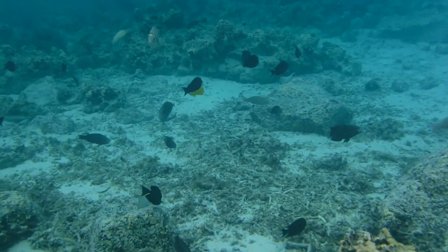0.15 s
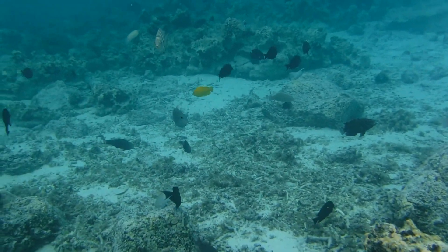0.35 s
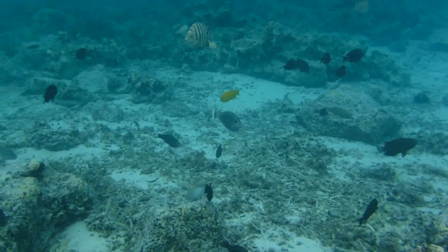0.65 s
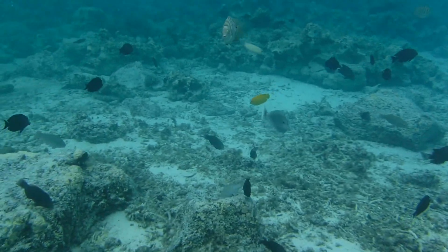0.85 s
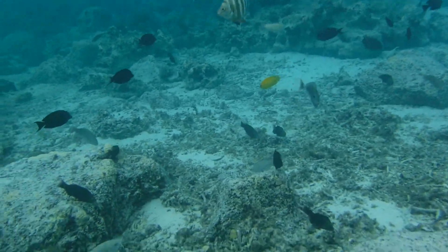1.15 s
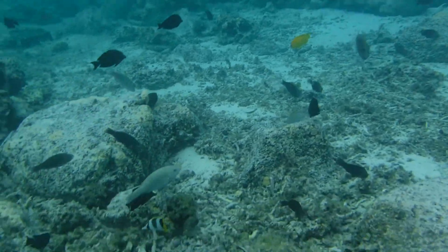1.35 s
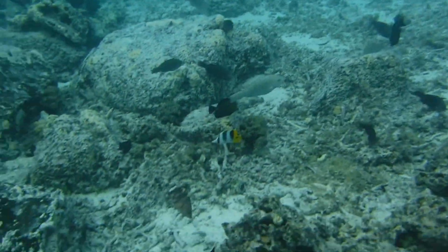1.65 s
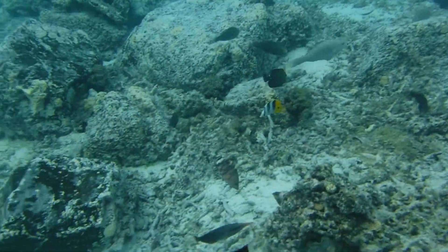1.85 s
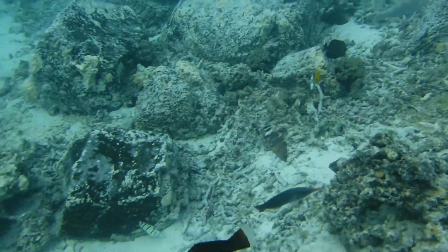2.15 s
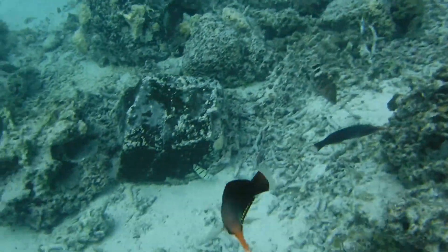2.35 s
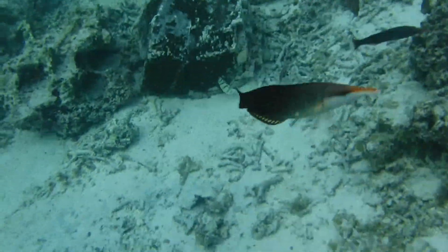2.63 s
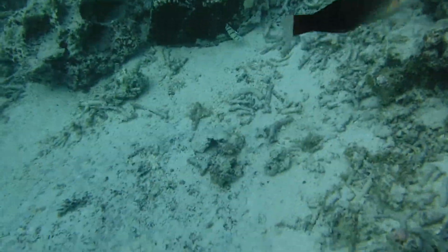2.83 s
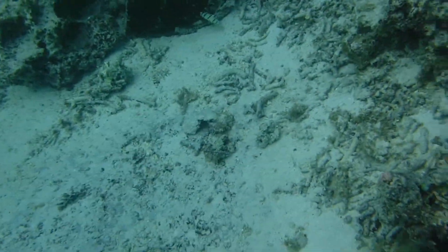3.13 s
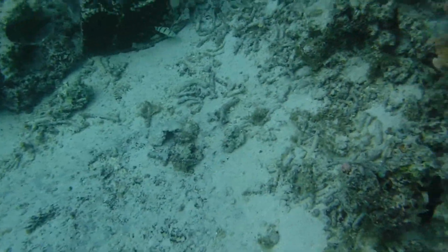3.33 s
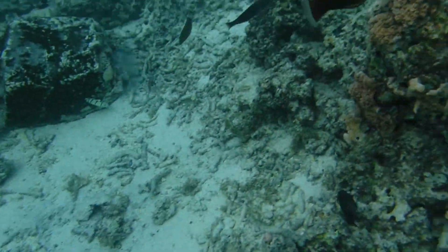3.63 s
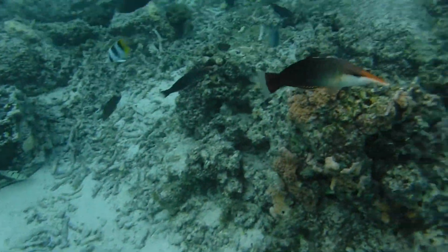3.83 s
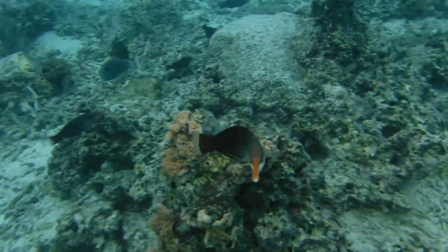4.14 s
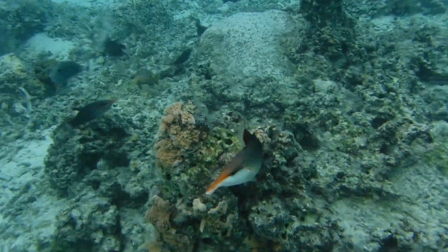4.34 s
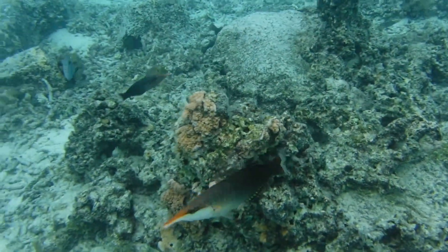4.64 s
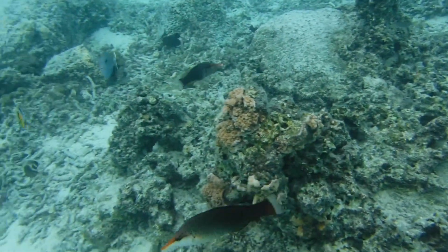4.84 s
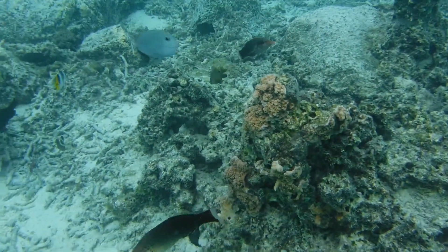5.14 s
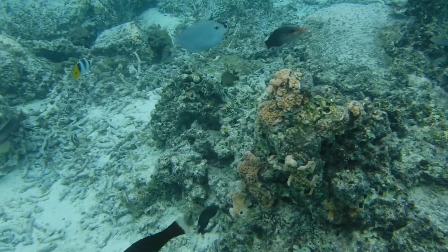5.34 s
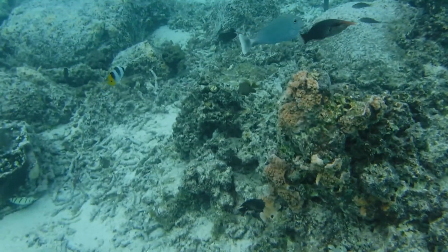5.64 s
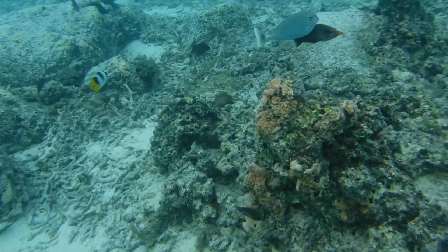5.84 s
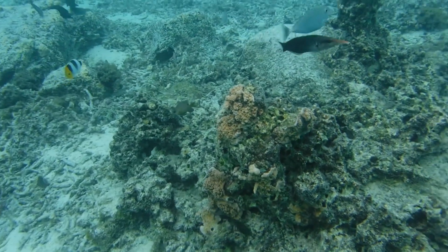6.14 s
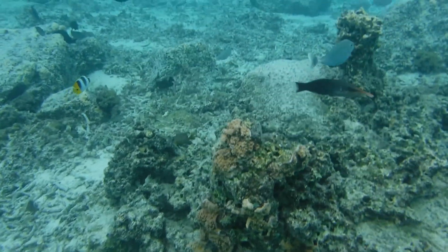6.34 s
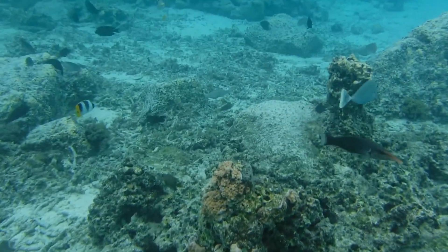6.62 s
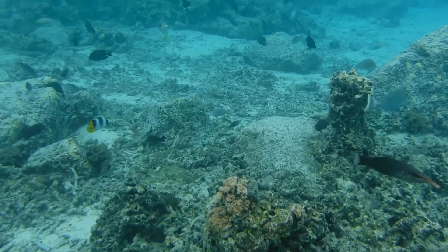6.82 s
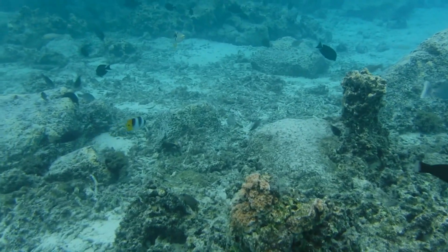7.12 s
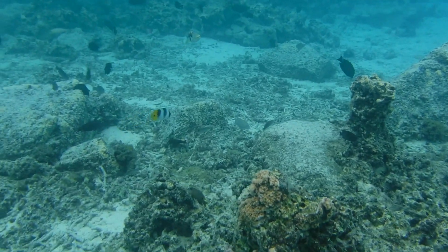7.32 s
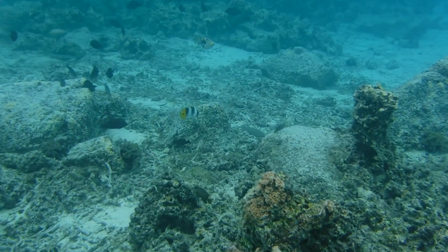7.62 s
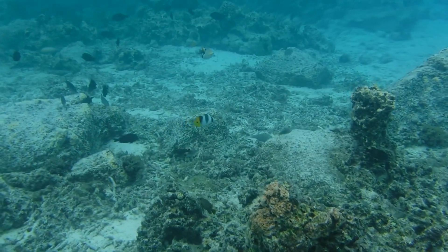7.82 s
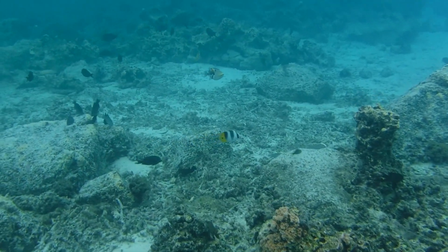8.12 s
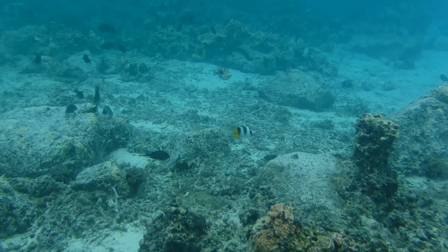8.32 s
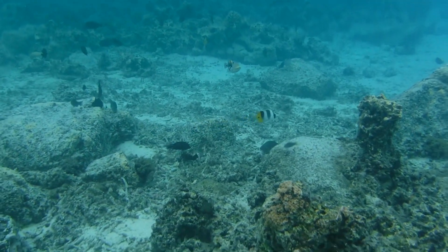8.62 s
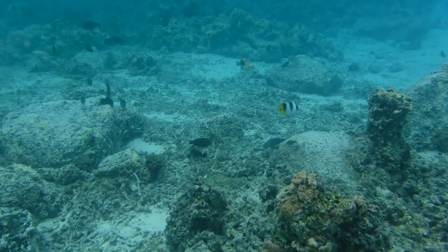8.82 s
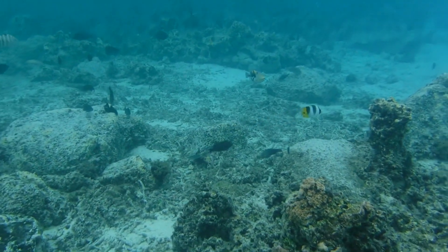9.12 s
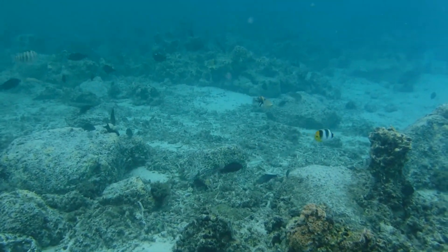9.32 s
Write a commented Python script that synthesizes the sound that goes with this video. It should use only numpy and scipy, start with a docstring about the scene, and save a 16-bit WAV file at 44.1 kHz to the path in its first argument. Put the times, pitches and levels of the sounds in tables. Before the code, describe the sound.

Muffled underwater hum and low water rumble, with dull knocks and a brief scrape on the camera housing and faint shrimp ticks.

```python
"""Water rumbles and a muffled hum fills a waterproof camera housing carried over a coral reef.
The flow buffets the case; steady shaking through its resonances makes the hum.
The grip knocks, rubs, judders and once scrapes on the shell.
Snapping shrimp tick faintly as their bubbles collapse; the electronics add hiss and a thin whine."""
import sys
import numpy as np
from scipy import signal
from scipy.fft import rfft, irfft
from scipy.io import wavfile

SR = 44100
rng = np.random.default_rng(int(sys.argv[2]) if len(sys.argv) > 2 else 0)


def pcm_store(signal):
    """Save signal as 16-bit PCM."""
    levels = np.round(np.clip(np.atleast_2d(signal), -1, 1) * 32767)
    wavfile.write(sys.argv[1], SR, levels.astype(np.int16).T)


N = 417625
TIME_S = np.arange(N) / SR
BINS_HZ = np.fft.rfftfreq(N, 1 / SR)


def amp(db):
    """Decibels to gain."""
    return 10 ** (np.asarray(db) / 20)


def unit(x):
    """Scale to rms 1."""
    return x / np.sqrt(np.mean(x ** 2) + 1e-20)


def follow(rows, column=1):
    """One column of a time curve, per sample."""
    rows = np.array(rows)
    return np.interp(TIME_S, rows[:, 0], rows[:, column])


def slope(points):
    """Gain per bin from (freq_hz, gain_db) points."""
    hz, db = np.transpose(points)
    return amp(np.interp(np.log(BINS_HZ + 1), np.log(hz), db))


def hump(hz, width_hz):
    """Gain per bin of one resonance."""
    return 1 / (1 + (2 * (BINS_HZ - hz) / width_hz) ** 2)


def colour(x, gain):
    """Filter x, then scale to rms 1."""
    return unit(irfft(rfft(x) * gain, N))


def noise(gain):
    """Noise of the given spectrum, rms 1."""
    return colour(rng.standard_normal(N), gain)


def drift(rate_hz):
    """Smooth random wander, rms 1."""
    return noise(np.exp(-(BINS_HZ / rate_hz) ** 2))


def add(mix, start_s, sound):
    """Mix a sound in at start_s."""
    part = mix[max(round(start_s * SR), 0):][:len(sound)]
    part += sound[:len(part)]


def ring(hz, t60_s, attack_s):
    """Struck mode: builds during contact, then decays."""
    t = TIME_S[:SR // 5]
    return np.sin(2 * np.pi * hz * t) * amp(-60 * t / t60_s) * (1 - np.exp(-t / attack_s))


def burst(hz, width_hz, t60_s):
    """Decaying noise puff through one resonance, peak 1."""
    t = TIME_S[:SR // 10]
    puff = rng.standard_normal(len(t)) * amp(-60 * t / t60_s)
    resonance = np.sin(2 * np.pi * hz * t) * np.exp(-np.pi * width_hz * t)
    out = signal.fftconvolve(puff, resonance)[:len(t)]
    return out / abs(out).max()


def stroke(start_s, length_s, attack_s, t60_s):
    """Gain of one movement: rise, hold, decay."""
    t = TIME_S - start_s
    return np.clip(t / attack_s + .5, 0, 1) * amp(-60 * np.maximum(t - length_s, 0) / t60_s)


def strokes(rows, attack_s, t60_s):
    """Gain of several movements; powers add."""
    return np.sqrt(sum((amp(db) * stroke(start_s, length_s, attack_s, t60_s)) ** 2
                       for start_s, length_s, db in rows))


def water(flow_db=5.5, lumps_db=1.9, shove_cycles=0.57):
    """Lumpy flow rumble; each shove swings the pressure for a cycle or two."""
    # flow strength: time_s, level_db
    flow = [(0, -34), (.6, -32.5), (1.5, -31.5), (2.9, -29.5), (3.45, -23.5), (3.7, -31.5), (3.9, -25.5),
            (4.5, -26.5), (5.3, -30), (6.2, -25), (6.6, -32.5), (7.3, -24.5), (7.9, -35), (8.6, -33.5),
            (9.0, -29), (9.47, -35.5)]
    # flow spectrum: freq_hz, gain_db
    spectrum = [(5, -23), (16, 1), (26, 5), (45, -6.5), (70, -8), (110, -18), (170, -22), (400, -54.5),
                (1000, -91.5)]
    # slow shoves on the case: centre_s, level_db, pitch_hz
    shoves = [(.483, -10.5, 24.7), (0.607, -8, 50), (1.59, -11, 54), (2.284, -8, 30.6), (2.352, -8, 32),
              (2.428, -3, 42.2), (4.332, -7.5, 28.6), (4.695, -3.5, 42), (6.135, -3.5, 50.7),
              (6.287, -3, 53.5), (6.324, -7, 74), (7.147, -8, 56), (7.312, 0, 58.3), (8.406, -10, 30.2),
              (8.827, -7.5, 52), (9.002, -9.5, 41.8), (9.238, -9.5, 54.7)]
    out = noise(slope(spectrum)) * amp(follow(flow) + flow_db + lumps_db * drift(rate_hz=6))
    t = np.arange(-SR // 10, SR // 10) / SR
    for centre_s, db, hz in shoves:
        swing = np.cos(2 * np.pi * (hz * t + rng.random()))
        add(out, centre_s + t[0], amp(db) * swing / np.cosh(2 * hz * t / shove_cycles))
    return out


def hum(hum_db=0.38, waver_db=1.43, drone_db=3, drone_hz=230, drone_width_hz=100):
    """Steady shaking through the case resonances, plus a low drone."""
    # case resonances: centre_hz, width_hz, gain_db
    resonances = [(125, 78, -29.5), (356.8, 100, 1), (490, 110, -11), (618, 103, -4), (789.3, 167, -11.5),
                  (1030, 120, -22.5), (1173, 138, -23.5), (1750, 330, -36)]
    # hum drive: time_s, level_db
    drive = [(0, -28.5), (.75, -25.5), (1.1, -28), (1.5, -36.5), (2.0, -28.5), (2.3, -32), (2.85, -34),
             (3.08, -30), (3.95, -34), (4.35, -29), (5.8, -30.5), (6.1, -28), (6.55, -31.5), (7.15, -25.5),
             (7.55, -29.5), (8.3, -27), (9.05, -28.5), (9.47, -31)]
    # case drone: time_s, level_db
    drone_levels = [(0.0, -35), (0.61, -46), (1.45, -31), (2.58, -40.5), (3.14, -38), (3.51, -30),
                    (3.9, -35.5), (5.09, -41.5), (5.43, -26), (6.28, -40.5), (6.64, -37.5), (7.02, -43),
                    (7.38, -34), (8.09, -51), (9.47, -44)]
    body = np.sqrt(sum((amp(db) * hump(hz, width_hz)) ** 2 for hz, width_hz, db in resonances))
    shaking = noise(body) * amp(follow(drive) + hum_db + waver_db * drift(rate_hz=16.4))
    drone = noise(hump(drone_hz, drone_width_hz)) * amp(follow(drone_levels) + drone_db)
    return shaking + drone


def knocks(attack_s=0.0011, thud_db=2, recoil_db=-6, contact_db=-25):
    """Soft blows ring the water-damped case briefly; hard ones ring its higher modes."""
    # knocks of the grip on the case, plus a rub near 4.2 s and the judder's first jolts near 5.2 s: start_s,
    # level_db, pitch_hz, t60_s, tick_offset_db
    blows = [(.72, -16, 174, 0.036, -30), (1.115, -9, 249, 0.032, -34), (1.132, -12.5, 143, .05, -34),
             (2.082, 2.5, 210, 0.025, -29), (2.308, 6, 268, 0.023, -22), (2.805, 1, 359, 0.024, -29),
             (3.356, -5.5, 310, 0.061, -27), (4.18, -11, 307, 0.073, -15), (4.205, -11, 294, 0.11, -31),
             (5.034, -4, 181, 0.023, -35), (5.2, -4.5, 225, 0.15, -40), (5.216, -3.5, 144, 0.1, -45),
             (5.239, 3.5, 216, 0.048, -19), (5.971, -7, 218, .025, -38), (6.128, -7.5, 198, 0.012, -25),
             (6.875, -11, 185, 0.025, -35), (7.133, -8.5, 227, 0.032, -36), (7.308, -1.5, 126, .028, -29),
             (8.532, -3.5, 247, 0.013, -42), (8.81, -9, 213, .016, -35), (8.956, 0, 300, 0.015, -47),
             (8.989, 6, 215, 0.022, -45), (9.24, -2, 220, .01, -47)]
    # hard shell clicks: start_s, level_db
    clicks = [(2.8188, -19.5), (3.1585, 3), (3.1601, -3), (5.2404, -21), (7.3104, -20), (8.9913, -26)]
    # shell modes: pitch_hz, level_db, t60_s
    modes = [(280, 2, 0.063), (620, -10, 0.016), (890, -5, 0.0094), (954, 0.5, 0.015), (1440, 17.5, 0.0035),
             (1820, -15, 0.0083), (2400, -10.5, 0.013), (2930, -8, 0.011), (3810, -8, 0.0064),
             (6540, -23, 0.0029)]
    out = np.zeros(N)
    for start_s, db, hz, t60_s, tick_db in blows:
        thud = ring(hz, t60_s, attack_s)
        recoil = ring(0.475 * hz, 1.67 * min(t60_s, .04), attack_s)  # whole case moves
        tick = burst(hz=850, width_hz=1100, t60_s=0.024)
        add(out, start_s, amp(db + thud_db) * thud)
        add(out, start_s, amp(db + recoil_db) * recoil)
        add(out, start_s, amp(db + tick_db) * tick)
    # adjacent modes reach the microphone in opposite phase
    click = sum((-1) ** k * amp(db) * ring(hz, t60_s, attack_s=0.00079)
                for k, (hz, db, t60_s) in enumerate(modes))
    for start_s, db in clicks:
        add(out, start_s, amp(db) * click / abs(click).max())
        add(out, start_s, amp(db + contact_db) * burst(hz=6000, width_hz=4500, t60_s=.004))
    return out


def judder(jitter=0.02):
    """Near-regular stick-slip of the grip: a short low groan."""
    # grip slips: time_s, level_db, rate_hz
    slips = [(5.275, -33, 105), (5.286, -9, 98), (5.298, -6.5, 128), (5.312, -2.5, 120), (5.325, -8.5, 119),
             (5.342, -17, 100), (5.38, -24, 103), (5.43, -43, 140)]
    # groan partials: harmonic, level_db
    partials = [(1, 3), (2, 1), (3, -23)]
    rate_hz = follow(slips, column=2) * (1 + jitter * drift(rate_hz=55))
    cycles = np.cumsum(rate_hz) / SR
    tone = sum(amp(db) * np.sin(2 * np.pi * round(k) * cycles) for k, db in partials)
    slipping = (TIME_S > slips[0][0]) & (TIME_S < slips[-1][0])
    return unit(tone) * amp(follow(slips)) * slipping


def eddies(attack_s=0.016, t60_s=0.16, jitter=0.2507, uneven_db=3.0):
    """Eddies shed by the swung case rock the pressure at uneven rate and strength."""
    # eddy buffets: start_s, length_s, level_db, rate_hz
    buffets = [(3.202, 0.11, -11, 50), (3.389, 0.088, -14, 72), (5.973, 0.15, -20, 55),
               (6.095, .1, -17, 82)]
    warped_s = np.cumsum(1 + jitter * drift(rate_hz=51.2)) / SR
    swings = sum(amp(db) * stroke(start_s, length_s, attack_s, t60_s) * np.sin(2 * np.pi * hz * warped_s)
                 for start_s, length_s, db, hz in buffets)
    return np.sqrt(2) * swings * amp(uneven_db * drift(rate_hz=40))


def scrape(rest_hz=756, top_hz=1150, width_hz=150, squeak_db=-3, rasp_db=-1.5, grain_db=3.0):
    """Grainy hand friction excites the shell; one resonance rises and sinks with the grip."""
    # hand pushes: start_s, length_s, level_db
    pushes = [(3.3, 0.14, -28.5), (3.495, 0.078, -17), (3.59, 0.052, -20.5), (3.668, 0.025, -15.5),
              (3.84, 0.037, -32.5), (3.965, 0.021, -33.5)]
    # rasp spectrum: freq_hz, gain_db
    spectrum = [(80, -9), (200, -7), (310, 10), (520, -6), (850, -4), (1200, -10.5), (1500, -8),
                (1900, -13.5), (2450, -19), (2750, -35), (4200, -53), (7000, -75), (16000, -70)]
    top_s, rise_s, sink_s = 3.494, 0.18, .12
    friction = rng.standard_normal(N) * amp(grain_db * np.tanh(drift(rate_hz=130)))
    t = TIME_S - top_s
    grip = np.exp(-(t / np.where(t < 0, rise_s, sink_s)) ** 2)
    # moving band-pass: shift to 0 Hz, low-pass, shift back
    carrier = np.exp(2j * np.pi * np.cumsum(rest_hz + (top_hz - rest_hz) * grip) / SR)
    lowpass = 1 / (1 + (np.fft.fftfreq(N, 1 / SR) / width_hz) ** 2)
    baseband = np.fft.ifft(np.fft.fft(friction / carrier) * lowpass)
    squeak = amp(squeak_db) * unit((carrier * baseband).real)
    rasp = amp(rasp_db) * colour(friction, slope(spectrum))
    return (squeak + rasp) * strokes(pushes, attack_s=0.036, t60_s=0.26)


def shrimp(crack_db=-14, far_per_s=300, spread_db=5.5, far_db=-57, fade_db_per_s=.5):
    """Collapsing bubbles: a few near snaps over a slowly fading far crackle."""
    # near snaps and pings: start_s, level_db, centre_hz, width_hz
    snaps = [(.931, -35.5, 5000, 1500), (1.0149, -26.5, 4480, 450), (1.033, -31, 1230, 300),
             (1.687, -37, 3700, 700), (1.785, -23.5, 1020, 200), (1.941, -35.5, 3860, 800),
             (2.173, -36.5, 2740, 910), (2.921, -36, 4000, 900), (3.2892, -33, 3260, 2600),
             (3.489, -34.5, 4100, 1210), (3.9787, -31.5, 3900, 700), (4.3286, -29.5, 4170, 600),
             (4.498, -33.5, 2320, 250), (4.87, -32.5, 3780, 2000), (5.5326, -36.5, 4000, 900),
             (6.164, -38, 2380, 400), (6.232, -39, 4600, 1200), (6.8164, -36, 4370, 890),
             (7.3922, -35.5, 4070, 500), (7.656, -35, 2500, 1600), (8.624, -38, 3000, 1800),
             (9.322, -42.5, 2730, 200)]
    # crackle spectrum through the case: freq_hz, gain_db
    spectrum = [(500, -29), (1500, 9), (2200, -6), (2900, -4), (4000, 2.5), (5200, -4), (6500, -6.5),
                (9000, -14), (16000, -37)]
    near, far = np.zeros(N), np.zeros(N)
    for start_s, db, hz, width_hz in snaps:
        add(near, start_s, amp(db) * burst(hz, width_hz, t60_s=0.043))
        add(near, start_s, amp(db + crack_db) * burst(hz=4600, width_hz=3800, t60_s=0.0075))
    pitches_hz = np.geomspace(1500, 5600, num=24)
    for hz in pitches_hz:
        sizes = amp(spread_db * np.minimum(rng.exponential(1, N), 4))
        fires = rng.random(N) < far_per_s / len(pitches_hz) / SR
        far += signal.oaconvolve(sizes * fires, burst(hz, width_hz=750, t60_s=0.026))[:N]
    return near + colour(far, slope(spectrum)) * amp(far_db - fade_db_per_s * TIME_S)


def rustle(grain_db=3, hold_db=-58, rise_db_per_s=0.4):
    """Skin shifts on the case: a faint, slowly growing rustle with a few firmer rubs."""
    # hand rubs: start_s, length_s, level_db
    rubs = [(.49, 0.08, -50), (.68, 0.23, -50.5), (1.15, 0.49, -51), (1.72, 0.082, -48), (2.2, 0.65, -54.5),
            (4.1, .42, -51.5), (4.9, 1.03, -56.5), (6.95, .37, -51), (9.3, 0.045, -48.5)]
    # rubbing spectrum: freq_hz, gain_db
    spectrum = [(300, -19.5), (1050, 4.5), (1400, 3), (2100, 0.5), (2700, -11.5), (3250, -8), (4500, -11.5),
                (6500, -27.5), (16000, -36.5)]
    holding = amp(hold_db + rise_db_per_s * TIME_S)
    rubbing = strokes(rubs, attack_s=0.041, t60_s=0.18)
    friction = rng.standard_normal(N) * amp(grain_db * drift(rate_hz=88))
    return colour(friction, slope(spectrum)) * np.hypot(holding, rubbing)


def electronics(hiss_db=-58.5):
    """Amplifier hiss and a thin whine with sidebands."""
    # hiss spectrum: freq_hz, gain_db
    spectrum = [(100, 6.5), (3000, 3), (7000, 1.5), (11000, 0), (15500, -2)]
    # whine tones: pitch_hz, rms_db
    tones = [(13628.7, -79.5), (13688.7, -78), (13748.7, -92), (13808.8, -91)]
    whine = sum(np.sqrt(2) * amp(db) * np.sin(2 * np.pi * (hz * TIME_S + rng.random()))
                for hz, db in tones)
    return amp(hiss_db) * noise(slope(spectrum)) + whine


def scene():
    """Sum at one microphone inside the case."""
    mix = hum() + water() + eddies() + knocks() + judder() + scrape()
    return (mix + rustle() + shrimp() + electronics())[None]


def record(dry):
    """The hardest blows soft-clip the input; a low-pass limits the band."""
    ceiling, cutoff_hz = .82, 15800
    clipped = dry / (1 + (dry / ceiling) ** 16) ** (1 / 16)
    lowpass = signal.firwin(511, cutoff_hz, window=("kaiser", 9), fs=SR)
    return signal.oaconvolve(clipped, lowpass[None], "same")


dry = scene()
out = record(dry)
pcm_store(out)
```